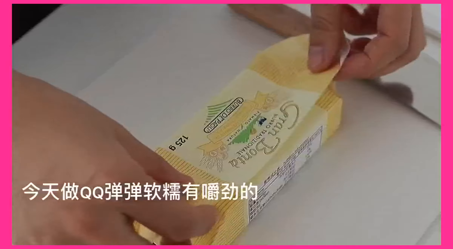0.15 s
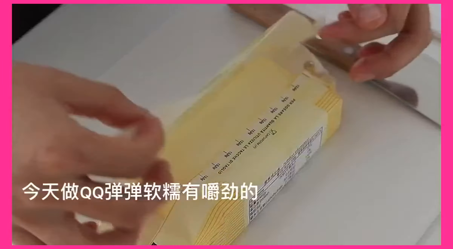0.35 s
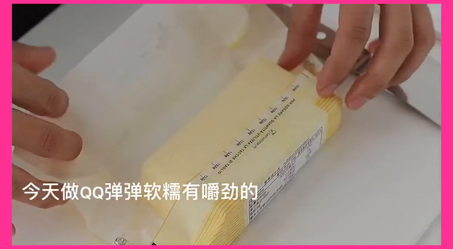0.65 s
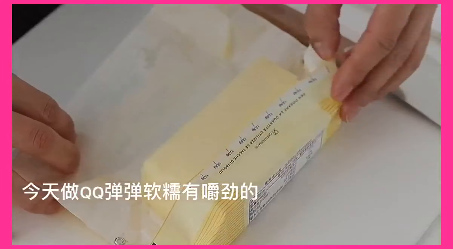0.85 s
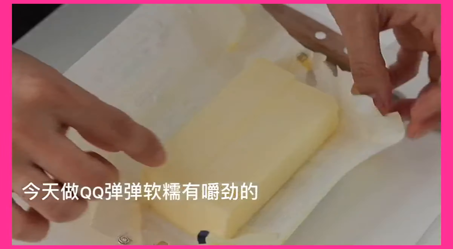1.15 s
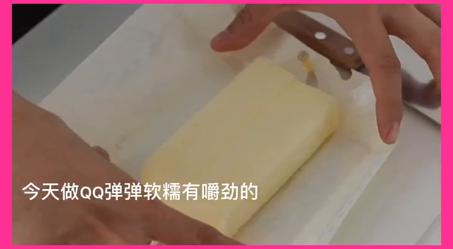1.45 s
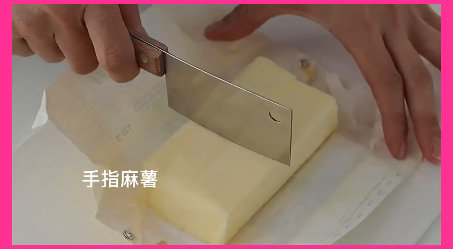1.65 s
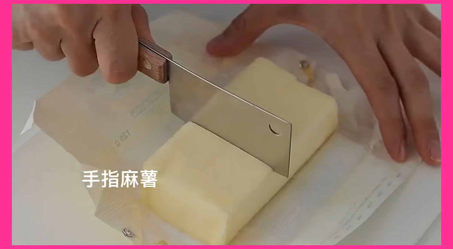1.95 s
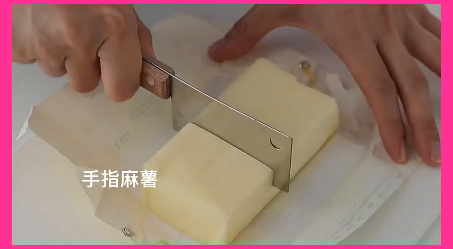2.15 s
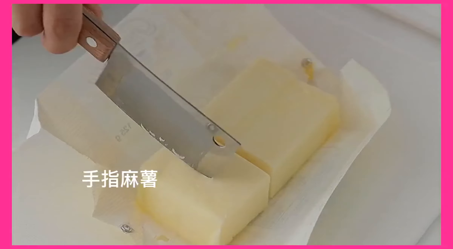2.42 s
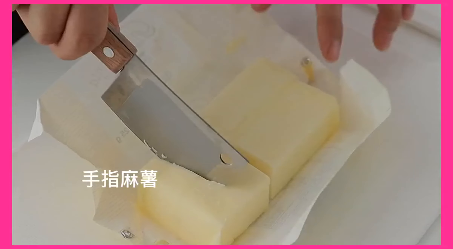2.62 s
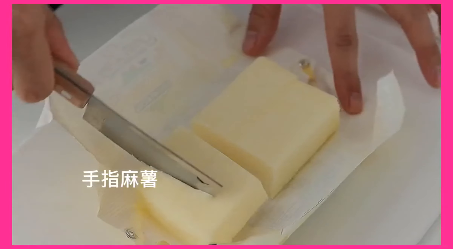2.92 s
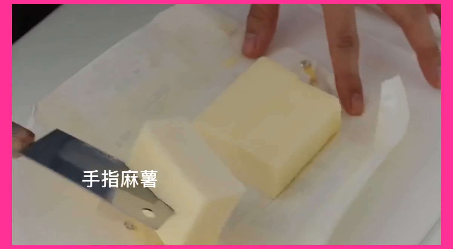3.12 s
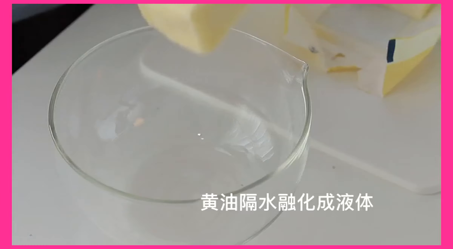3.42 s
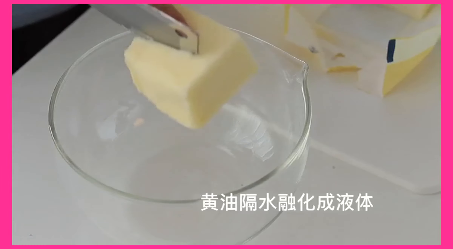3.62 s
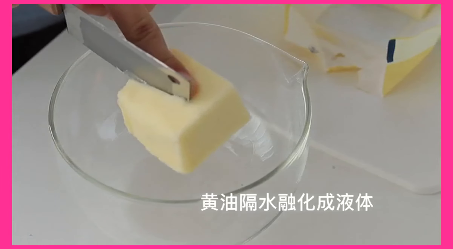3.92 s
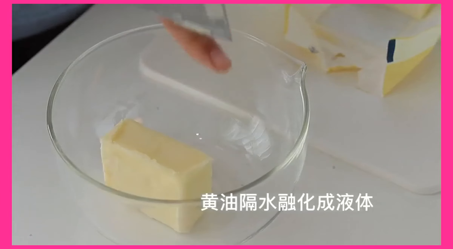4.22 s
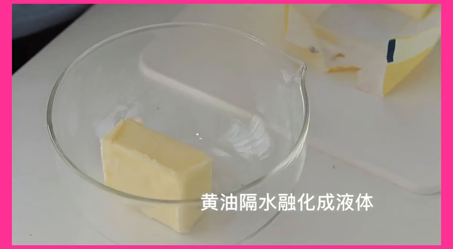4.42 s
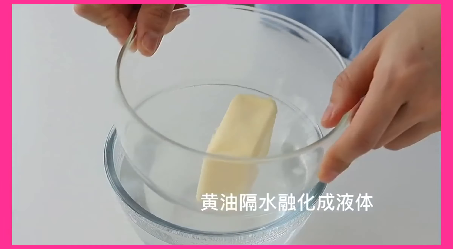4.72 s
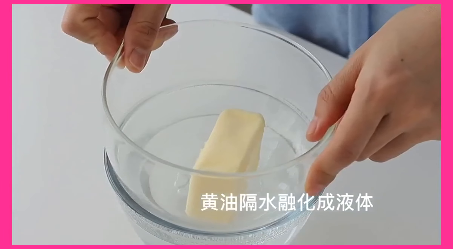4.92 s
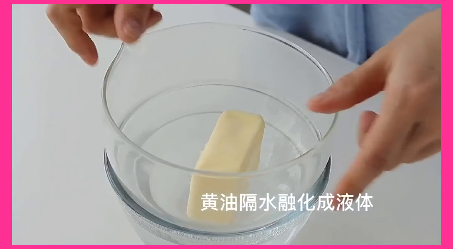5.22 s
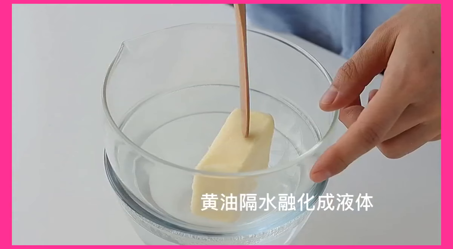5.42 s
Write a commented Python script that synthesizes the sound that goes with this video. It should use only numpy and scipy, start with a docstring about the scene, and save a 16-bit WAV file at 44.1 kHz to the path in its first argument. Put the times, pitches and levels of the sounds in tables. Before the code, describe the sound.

Close microphone, slight stereo width, dry small room. Rapid crisp paper crinkles with low table bumps come first, then isolated snaps and scrapes while butter is cut and lifted. A quiet gap ends with a soft double thud of butter in glass. Room tone jumps to a faint whir, glass knocks hard on glass five or six times, rattles, and settles with a thin squeak and low table hum.

```python
"""In a quiet kitchen, hands unfold the paper around a block of butter and cut it on a board with a cleaver.
Paper is resonance-coloured grain with creases that crack; hands and blade push low resonances of board and table.
The piece lands in a glass bowl as damped modes with wet slaps; that bowl then knocks and rattles onto
a second bowl of water, both ringing in their own modes. Four successive stretches each have their own
room tone: hush, the whir of an appliance, hum and whine, heard close up with a slight stereo width."""
import sys
import numpy as np
from scipy import signal
from scipy.fft import rfft, irfft, next_fast_len
from scipy.io import wavfile
from scipy.ndimage import uniform_filter1d

SR = 44100
rng = np.random.default_rng(int(sys.argv[2]) if len(sys.argv) > 2 else 0)


def wav_record(signal):
    """Record a signal, one row per channel, as 16-bit PCM in the file named by sys.argv[1]."""
    frames = np.transpose(np.atleast_2d(signal))
    bounded = np.clip(frames, -1, 1)
    # unit amplitude maps onto the largest positive 16-bit level
    quanta = np.round(bounded * 32767).astype(np.int16)
    wavfile.write(sys.argv[1], SR, quanta)


N = 245195
TIME = np.arange(N) / SR
COARSE_TIME = TIME[::32]  # slow gain curves are computed on this grid

# Stretches of room tone: start t/s, tone level/dB, whir share (power, 0-1), whine level/dB,
# side level against the tone/dB
STRETCHES = [(0.042, -52.5, 0.53, -90, -17), (1.651, -53.5, 0.01, -87, -21), (3.508, -60, 0, -80.5, -2),
             (4.519, -49.5, 0.94, -72.5, -31.5)]
# Glass on glass: t/s, level/dB, clack f/Hz, treble against the clack/dB, upper-bowl ring/dB, lower-bowl ring/dB,
# then level offsets of the contact modes/dB: below 1 kHz, 1-4 kHz, above 4 kHz
KNOCKS = [(4.834, -0.5, 2010, -13.5, -22.5, -49, -23, -9, -23.5),
          (4.943, -1, 2730, -46, -29.5, -18, -38, -9, -27),
          (4.971, -14.5, 895, -46, -45, -47.5, -31, -5, -30),
          (5.006, -0.5, 3020, -20, -26.5, -33.5, -35, -7.5, 0),
          (5.064, -3.5, 1750, -6.5, -38, -17.5, 5, -7, -1), (5.088, -8, 2100, -18, -55, -31, -2, -10, -17)]
# The whistle as the fingers let go: start t/s, end t/s
SQUEAK_SPAN = (5.265, 5.33)


def amp(db):
    """Converts level/dB to an amplitude ratio."""
    return 10 ** (np.asarray(db) / 20)


def evened(x):
    """Normalises to unit root-mean-square amplitude."""
    return x / np.sqrt(np.mean(x ** 2) + 1e-20)


def colour(x, points):
    """Linear filtering: multiplies the spectrum by a gain curve of (f/Hz, level/dB) points."""
    size = next_fast_len(len(x))
    f, db = np.transpose(points)
    hz = np.fft.rfftfreq(size, 1 / SR)
    gain = amp(np.interp(np.log(hz + 1), np.log(f + 1), db))
    return irfft(rfft(x, size) * gain, size)[:len(x)]


def band(x, hz, width):
    """Damped resonator: a two-pole resonance of gain near 1, its bandwidth set by the pole radius."""
    r = np.exp(-np.pi * width / SR)
    angle = 2 * np.pi * hz / SR
    return signal.lfilter([1 - r * r], [1, -2 * r * np.cos(angle), r * r], x) * np.sin(angle)


def band_twice(x, hz, width, second_ratio):
    """Cascaded resonators: two resonances at one frequency give steeper skirts."""
    return band(band(x, hz, width), hz, second_ratio * width)


def treble(x):
    """Band-pass filtering from 5 to 12 kHz."""
    return signal.sosfilt(signal.butter(2, [5000, 12000], "band", fs=SR, output="sos"), x)


def add(mix, s, sound):
    """Superposition: adds a sound into the mix from time s."""
    part = mix[round(s * SR):][:len(sound)]
    part += sound[:len(part)]


def loudness(rows):
    """Amplitude envelope along (t/s, level/dB) points, silent outside them."""
    s, db = np.transpose(rows)
    return uniform_filter1d(amp(np.interp(TIME, s, db, -200, -200)), 60)


def swells(rows):
    """Exponential envelopes, one a row: straight rise and fall in dB, confined to the stretch of the peak."""
    peak, db, rise, fall = np.transpose(rows)[:4, :, None]
    starts = np.transpose(STRETCHES)[0]
    before = (peak - COARSE_TIME) / np.maximum(rise, .001)
    after = (COARSE_TIME - peak) / np.maximum(fall, .001)
    same_stretch = np.searchsorted(starts, COARSE_TIME) == np.searchsorted(starts, peak)
    swell_db = 20  # gained over a rise time, lost over a fall time
    return amp(db - swell_db * np.maximum(before, after)) * same_stretch


def total(gains):
    """Incoherent addition: the power sum of gain curves, at full rate."""
    return np.interp(TIME, COARSE_TIME, np.sqrt((gains ** 2).sum(0)))


def ring(modes, t, scatter_db=3):
    """Modal synthesis: damped sines whose starting levels are scattered at random."""
    place_db = scatter_db * rng.standard_normal(len(modes))
    return sum(amp(db + p - 60 * t / t60) * np.sin(2 * np.pi * hz * t)
               for (hz, db, t60), p in zip(modes, place_db))


def crack(peak_db, hz, treble_db, wide_db, t60, grit):
    """Impulse excitation: one flip and a little grit drive a round pop, a wide click and a spit of treble."""
    t = np.arange(len(grit)) / SR
    burst = grit * (1 - np.exp(-t / (0.15 * t60))) ** 2 * amp(-60 * t / t60)
    burst[int(.06 * t60 * SR)] += 8 * np.sign(grit[0])  # the flip is instantaneous
    width = hz * (.16 + .2 * min(amp(wide_db), 1))  # a stronger click goes with a shorter pop
    pop = band_twice(burst, hz, width, 2)
    click = band(band(.5 * burst + grit * amp(-90 * t / t60), 2600, 2600), 3100, 1500)
    body = pop / abs(pop).max() + amp(wide_db) * click / abs(click).max()
    body = signal.sosfilt(signal.butter(3, [500, 4600], "band", fs=SR, output="sos"), body)
    spit = treble((.4 * burst + grit * amp(-40 * t / t60)) * amp(-30 * t / t60))
    return amp(peak_db) * (body / abs(body).max() + amp(treble_db) * spit / abs(spit).max())


def rustle():
    """Stochastic friction: clumped fibre clicks over sliding hiss, in the shifting resonances of a bent sheet."""
    # Tugs and slides of the paper: peak t/s, level/dB, rise t/s, fall t/s, treble against the rustle/dB,
    # tautness/dB moved from the low to the high half
    tugs = [(0.049, -28, 0.0017, 0.12, -16, -0.5), (0.118, -26.5, 0.0097, 0.2, -12, -3),
            (0.157, -12.5, 0.027, 0.016, -8, 3.5), (0.225, -22.5, 0.077, 0.041, -6.5, 3.5),
            (0.299, -31.5, 0.057, 0.19, -10.5, -3), (0.358, -20.5, 0.028, 0.02, -13, -3.5),
            (0.439, -18.5, 0.035, 0.023, -25, -5), (0.484, -20, 0.0037, 0.013, -33.5, -5),
            (0.517, -35.5, 0.014, 0.19, -40, -8), (0.667, -23.5, 0.028, 0.045, -9.5, 3),
            (0.75, -37.5, 0.12, 0.038, -20, 2.5), (0.768, -22.5, 0.0019, 0.018, -22, -9),
            (0.89, -28, 0.028, 0.02, -4.5, 11.5), (0.985, -47.5, 0.2, 0.027, -4, 11.5),
            (1.032, -20.5, 0.034, 0.045, -5.5, 6.5), (1.087, -13.5, 0.043, 0.046, -18, -1.5),
            (1.136, -31.5, 0.048, 0.027, -27.5, 2), (1.213, -24, 0.046, 0.022, -14, 0),
            (1.334, -32, 0.054, .06, -8.5, 5), (1.366, -18.5, 0.02, 0.027, -17, -4),
            (1.449, -23, 0.018, 0.054, -28, -2.5), (1.481, -27, 0.025, 0.14, -11.5, 7.5),
            (1.585, -24, 0.14, 0.038, -20.5, -1.5), (1.64, -30, 0.023, 0.027, -9, 4.5),
            (1.731, -50.5, 0.12, 0.084, -1, 4.5), (2.039, -35, 0.011, .036, -14.5, 7.5),
            (2.095, -44.5, 0.014, 0.099, -19, 0.5), (2.222, -30, 0.014, 0.054, -29, -1.5),
            (2.321, -36.5, 0.033, 0.077, -38, -10.5), (2.386, -18, 0.014, 0.036, -11, -6),
            (2.458, -29, 0.023, 0.0036, -8, -1), (2.727, -18.5, 0.014, 0.071, -11, 1.5),
            (2.771, -24, 0.026, .12, -9, -1), (2.862, -32, 0.081, 0.059, -14, 12),
            (2.902, -27, 0.0021, 0.058, -9, 1), (3.001, -25, 0.11, 0.018, -16, -2),
            (3.051, -31.5, 0.034, 0.014, -15, -6), (3.073, -40.5, 0.012, 0.049, -7, 3),
            (3.141, -40.5, 0.0025, 0.11, -5, -1), (3.27, -15, 0.022, 0.025, -15.5, -3),
            (3.324, -40.5, 0.027, 0.054, -32, 6.5), (3.428, -25.5, 0.012, 0.018, -13, -3.5),
            (3.46, -44, 0.016, 0.16, -10, 4), (4.194, -30.5, 0.022, 0.04, -5.5, 1)]
    # Spectrum of the rustle: f/Hz, relative level/dB per Hz
    paper_spectrum = [(250, -24), (480, -13.5), (770, -3), (1200, -4), (2100, -5.5), (3700, -9.5),
                      (4700, -28.5), (6000, -57.5)]
    # Spectrum of its treble: f/Hz, relative level/dB per Hz
    fibre_spectrum = [(3000, -16.5), (4500, -1), (5500, 2.5), (8000, 2), (12000, -4.5), (15300, -4),
                      (15700, -52.5)]
    # Hiss of the cleaver dragging off the paper: t/s, level/dB
    blade_level = [(3.27, -45.5), (3.3, -49), (3.41, -52.5)]

    clumps = evened(uniform_filter1d(uniform_filter1d(rng.standard_normal(N), 120), 120))
    struck = rng.random(N) < 3000 / SR  # about 3000 clicks a second
    clicks = struck * amp(4 * np.minimum(rng.exponential(1, N), 5)) * rng.choice([-1, 1], N)
    grain = (evened(clicks) * .65 + rng.standard_normal(N)) * amp(1.5 * clumps)

    hz, t, z = signal.stft(grain, SR, nperseg=256)
    patches = evened(uniform_filter1d(uniform_filter1d(rng.standard_normal(z.shape), 3, 0), 9, 1))
    gains = swells(tugs)
    treble_db, taut_db = np.transpose(tugs)[4:, :, None]
    power = gains ** 2
    taut = np.interp(t, COARSE_TIME, (power * taut_db).sum(0) / (power.sum(0) + 1e-20))
    tilt = np.clip(np.log2(hz / 1700 + 1e-9), -1, 1) * (hz < 4500)  # pivots about 1700 Hz
    lean = tilt[:, None] * taut
    grain = signal.istft(z * amp(3.7 * patches + lean), SR, nperseg=256)[1][:N]

    blade = loudness(blade_level) * evened(band(rng.standard_normal(N), 3750, 300))
    sheet = total(gains) * evened(colour(grain, paper_spectrum))
    fibres = total(gains * amp(treble_db)) * evened(colour(grain, fibre_spectrum))
    return sheet + fibres + blade


def snaps():
    """Snap-through buckling: each crease cracks, and the sheet shivers on for a moment."""
    # Creases snapping over: t/s, peak level/dB, pop f/Hz, treble against the body/dB, wide click against the pop/dB
    creases = [(0.075, -16, 1200, -13, -34), (0.111, -11.5, 1500, -20.5, 7), (0.149, -7, 1130, -20, -21),
               (0.157, -5, 1500, -22, -11), (0.188, -9.5, 1630, -30, -40), (0.207, -2.5, 2232, -11, 7),
               (0.239, -1.5, 1520, -25, -2), (0.254, -4.5, 2240, -11.5, -27), (0.276, -12, 1600, -12, -16),
               (0.289, -17, 1530, -28, 7), (0.313, -14, 890, -25, 1), (0.328, -4, 950, -15, -6.5),
               (0.355, -0.5, 787, -12.5, 1), (0.4, -17.5, 1240, -29, -14), (0.422, -9, 1580, -17, 2),
               (0.431, -4, 1600, -24, -12), (0.438, -4, 1470, -13.5, -4), (0.447, -20, 1100, -34.5, -9),
               (0.473, -7.5, 1350, -25, -13), (0.481, -4.5, 1110, -28.5, -4.5), (0.515, 0, 1620, -24, -6.5),
               (0.544, -25.5, 592, -44, -20), (0.59, -30.5, 900, -5.5, -3), (0.666, -1.5, 1950, -21, -7.5),
               (0.766, 0, 2900, -54, 6), (0.767, -6, 1314, -43, -33), (0.783, -7.5, 1440, -30, -3.5),
               (0.867, -9.5, 2900, -4.5, -5), (0.899, -11.5, 2600, -15, -39), (0.997, -8.5, 1830, -31, -32),
               (1.06, -3.5, 1230, -23.5, 6), (1.084, -3, 1170, -9, -0.5), (1.093, -3.5, 2680, -27, -21),
               (1.125, -9.5, 1960, -25, 2), (1.186, -7.5, 1810, -13.5, -4.5), (1.483, -7, 1700, -12, 8.5),
               (1.515, -9, 2200, -24, 9), (1.565, -16, 617, -35, -11), (1.583, 3.5, 3760, -12, -3),
               (1.587, -9, 3000, -20, 4), (1.603, -13, 1950, -27, -1.5), (1.629, -16, 1770, -16.5, -12),
               (1.642, -13.5, 2120, -16.5, -5.5), (2.036, -24, 1480, -25, -36), (2.089, -23, 1750, -22, -4),
               (2.217, -12, 907, -37, -26), (2.218, -6.5, 1790, -31.5, -3.5),
               (2.294, -20.5, 1780, -23.5, -9.5), (2.318, -20, 826, -47, -27),
               (2.318, -18.5, 1760, -43, -30), (2.377, -5, 3660, -33, -15), (2.381, -5, 2900, -33, -9),
               (2.39, -8, 2700, -33, 17), (2.421, -11.5, 1330, -16, 2), (2.451, -9.5, 1790, 2, 5.5),
               (2.727, -6.5, 1850, -16, 0), (2.734, 2.5, 3520, -15.5, -5.5), (2.904, 0.5, 2100, -33, 11),
               (2.913, -5, 2960, -27, 3), (2.935, -24, 4150, 12.5, -10), (2.957, -4, 2290, -9.5, 12),
               (2.979, -6, 3400, -16.5, -4), (2.996, -14, 1260, -10, -4), (3.015, -11.5, 3220, -11, -10),
               (3.048, 0.5, 3700, -10, -6), (3.14, -21.5, 980, -2.5, -4), (3.23, -20.5, 730, -9.5, -12),
               (3.252, -4, 1780, -24.5, -10), (3.268, 3, 2900, -6.5, 13), (3.275, -1, 3560, -23, -17),
               (3.424, -3.5, 4000, -7, -21), (3.43, 0, 3220, -6.5, -9.5), (3.49, -29, 2910, -7.5, 2.5)]
    out = np.zeros(N)
    for (s, db, *tone), grit in zip(creases, rng.standard_normal((len(creases), 2500))):
        t60 = .012 - .0004 * db  # seconds; softer snaps ring a little longer
        add(out, s, crack(db, *tone, t60, grit))
    t = np.arange(3000) / SR
    shiver = rng.standard_normal(3000) * amp(-60 * t / .06) * (t > .003)
    return out + amp(-17) * signal.oaconvolve(out, shiver / np.linalg.norm(shiver))[:N]


def push():
    """Forced resonance: pressing hands and blade drive low noise through the modes of table and board."""
    # Pushes: peak t/s, level/dB, rise t/s, fall t/s, board against the table/dB
    pushes = [(0.366, -38, 0.031, 0.033, 13), (0.44, -23.5, 0.038, 0.063, -12.5),
              (1.14, -35.5, 0.13, 0.061, -1.5), (1.369, -23.5, 0.033, 0.056, -8),
              (1.521, -27, 0.025, 0.061, -23), (1.78, -43.5, 0.13, 0.1, -23),
              (2.062, -33, 0.049, 0.14, -27), (2.309, -33, 0.068, 0.055, -19),
              (2.396, -38.5, 0.021, 0.06, 8.5), (2.435, -17.5, 0.078, 0.035, -13.5),
              (2.752, -23, 0.042, 0.12, -15), (2.95, -41.5, 0.055, 0.082, -17),
              (3.266, -21.5, 0.028, 0.033, 2.5), (4.829, -41.5, 0.015, 0.15, 2.5),
              (5.04, -39, 0.13, 0.062, -3), (5.099, -25.5, 0.066, 0.081, -31),
              (5.29, -37.5, 0.023, 0.034, -35), (5.522, -39, 0.02, 0.4, -12.5)]
    # Table resonances: f/Hz, bandwidth/Hz, relative level/dB
    table_modes = [(33, 13, 1), (94, 18, 4), (143.1, 6.6, 1.5), (216.4, 16, -13)]
    # Board resonances: f/Hz, bandwidth/Hz, relative level/dB
    board_modes = [(268, 100, 0.5), (362.5, 350, 13), (546, 32, 0)]

    noise, gains = rng.standard_normal(N), swells(pushes)
    low, board = (evened(sum(amp(db) * evened(band_twice(noise, hz, w, 3)) for hz, w, db in modes))
                  for modes in (table_modes, board_modes))
    # slow level swings of the low noise are flattened
    steady = low / np.sqrt(uniform_filter1d(low ** 2, 2500) + .05)
    # a faint low rumble of the table lies under the first two stretches
    rumble = amp(-66.5) * (TIME > STRETCHES[0][0]) * (TIME < STRETCHES[2][0])
    board_db = np.transpose(pushes)[4, :, None]
    return (total(gains) + rumble) * steady + total(gains * amp(board_db)) * board


def drop():
    """Soft impact: a finite contact time smooths the blow to the bowl; a wet slap and a dull room tail join it."""
    # Butter landing and tipping: t/s, blow peak/dB, slap peak/dB, contact time/ms, click against the slap's pop/dB
    landings = [(4.192, -3, -11, 3.04, -2.5), (4.21, 0, -8, 0.88, -12), (4.228, -27, -27, 1.34, -23)]
    # Bowl on table: f/Hz, relative level/dB, t60/s
    thud_modes = [(77.2, -2, 0.31), (91.6, 10, 0.21), (147.8, 2.5, 0.23), (324, -17.5, 0.27),
                  (396, 0.5, 0.12), (454, -8.5, 0.21), (505, -5, 0.1), (654, -23.5, 0.44), (880, -21, 0.15),
                  (990, -17.5, 0.18), (1100, -30, 0.42)]

    out, t = np.zeros(N), np.arange(SR // 2) / SR
    grits = rng.standard_normal((len(landings), 2500))
    for (s, blow_db, slap_db, ms, click_db), grit in zip(landings, grits):
        contact = np.hanning(int(ms * SR / 1000) + 3)
        body = np.convolve(ring(thud_modes, t, scatter_db=1), contact / contact.sum())
        # the thud carries little below about 62 Hz
        body = signal.lfilter(*signal.butter(2, 62, "high", fs=SR), body)
        add(out, s, amp(blow_db) * body / abs(body).max())
        add(out, s + ms / 2000, crack(slap_db, 1150, click_db - 12, click_db, 0.006, grit))
    tail = colour(rng.standard_normal(len(t)), [(200, 8.0), (400, 4.0), (1100, -4.0), (2500, -43.5)])
    add(out, landings[1][0], amp(-26 - 60 * t / 0.3) * evened(tail))
    return out


def knocks():
    """Coupled impact: each knock clacks, excites the touching rims and rings the modes of both bowls."""
    # Both rims while they touch: nominal f/Hz, relative level/dB, nominal t60/s
    contact_modes = [(650, -9, .04), (1600, -8, .035), (1950, -6, .03), (2780, 0, .05), (3150, -1, .045),
                     (3600, -8, .025), (4750, -17, .03), (5080, -14, .03)]
    # Upper bowl: f/Hz, relative level/dB, t60/s
    upper_modes = [(388, -10, .4), (455, -6, .2), (1436, -5, .35), (1477, -6, .35), (1850, -10, .08),
                   (2715, -3, .14), (3250, -6, .04), (4743, -13, .3), (7381, -18, .25), (8489, -20, .08),
                   (9647, -13, .12), (12200, -20, .12), (15180, -24, .12)]
    # Lower bowl: f/Hz, relative level/dB, t60/s
    lower_modes = [(145, -12, .3), (510, -5, .15), (880, -12, .12), (2515, -2, .3), (2980, 2, .09),
                   (5000, -8, .08), (7250, -14, .07), (10450, -16, .07), (12700, -22, .07)]

    out, t = np.zeros(N), np.arange(SR // 2) / SR
    grits = rng.standard_normal((len(KNOCKS), 2500))
    for (s, db, hz, treble_db, upper_db, lower_db, *part_db), grit in zip(KNOCKS, grits):
        add(out, s, crack(db, hz, treble_db, -4 + db, 0.018, grit))
        touched = [(f, d + part_db[np.searchsorted([1000, 4000], f)], t60) for f, d, t60 in contact_modes]
        detuned_t = t * rng.uniform(.985, 1.015)  # each knock's modes are detuned at random by up to 1.5 %
        add(out, s, amp(db) * ring(touched, detuned_t, scatter_db=2.5) * np.minimum(t / .0006, 1))
        seated = np.clip((s - 4.93) / .13, 0, .9)  # the deeper it sits, the more the ring blurs
        wobble = evened(uniform_filter1d(rng.standard_normal(len(t)), 150))  # touching rims damp unevenly
        upper = amp(db + upper_db) * ring(upper_modes, t) * (1 + 0.45 * wobble[::-1])
        lower = amp(db + lower_db) * ring(lower_modes, t) * (1 - seated + seated * wobble)
        add(out, s, upper + lower)
    return out


def rim_chatter():
    """Sustained excitation: between knocks the chattering rims feed noise to broad and narrow resonances."""
    # Drive as the bowl settles: t/s, level/dB
    rattle_level = [(4.83, 5), (4.85, -10), (5.0, -2), (5.1, 1), (5.2, -20), (5.33, -30), (5.4, -70)]
    # Where the chatter gathers: f/Hz, bandwidth/Hz, gain/dB
    rim_modes = [(2900, 87, -21), (4820, 150, -32), (142.6, 8, -7.5), (263, 10, -12.5), (379, 6.9, -21.5),
                 (495, 5.5, -16)]
    chatter = loudness(rattle_level) * rng.standard_normal(N)
    out = colour(chatter, [(100, -54.0), (500, -21.0), (3000, -26.5), (5500, -55.0), (9000, -64.0)])
    return out + sum(amp(db) * band(chatter, hz, width) for hz, width, db in rim_modes)


def settling():
    """Free decay and friction: the table hums once, seated rims shimmer, and releasing fingers whistle thinly."""
    # Table hum as the bowl comes to rest: t/s, f/Hz, level/dB, t60/s
    table_hum = (5.5, 142, -22.5, 0.62)
    # Shimmer of the rims: f/Hz, bandwidth/Hz, starting level/dB, t60/s
    shimmer_modes = [(2930, 300, -40.5, .75), (4950, 300, -49, .42)]
    # Whistle partials: f/Hz, level/dB at the end of the swell
    whistle_partials = [(4400, -53.5), (6150, -70), (8200, -63.5)]

    out, t = np.zeros(N), np.arange(SR // 2) / SR
    add(out, table_hum[0], ring([table_hum[1:]], t, scatter_db=1) * np.minimum(t / .02, 1))

    last_knock = KNOCKS[-1][0]
    t = np.arange(0, SQUEAK_SPAN[1] - last_knock, 1 / SR)  # lasts until the fingers let go
    shimmer = sum(amp(db - 60 * t / t60) * evened(band_twice(rng.standard_normal(len(t)), hz, w, 2))
                  for hz, w, db, t60 in shimmer_modes)
    add(out, last_knock, shimmer)

    t = np.arange(*SQUEAK_SPAN, 1 / SR)
    whistle = sum(amp(db) * np.sin(2 * np.pi * hz * t) for hz, db in whistle_partials)
    swell = np.linspace(.2, 1, len(t))
    add(out, t[0], whistle * signal.windows.tukey(len(t), .3) * swell)
    return out


def wash():
    """Band-limited noise: an upper hiss fades as the bowl comes down."""
    # Hiss: t/s, level/dB
    hiss_level = [(4.52, -53.5), (4.8, -53.5), (5.1, -69)]
    return loudness(hiss_level) * evened(band(band(rng.standard_normal(N), 3660, 2460), 2050, 2900))


def room_tone():
    """Stationary noise: hush and whir share the power of each stretch, with wavering hum and thin electric whine."""
    # Hush: f/Hz, relative level/dB per Hz
    hush_spectrum = [(25, 12), (64, -3.5), (101, 8.5), (126, -25.5), (200, -11), (480, -5), (1300, -11.5),
                     (3500, -14.5), (5500, -20.5), (15400, -24), (15800, -42.5)]
    # An appliance running nearby: f/Hz, relative level/dB per Hz
    whir_spectrum = [(25, -25), (101, 0.5), (135, -31.5), (200, -11.5), (470, -21.5), (800, 5), (1230, 4.5),
                     (1420, 11), (1750, -3), (3800, -26.5), (5500, -21.5), (15400, -23), (15800, -52.5)]
    # Hum: f/Hz, level/dB
    hum_partials = [(91.5, -68), (199.2, -71)]
    # Whine, one a stretch: f/Hz
    whine_hz = [8000, 8000, 8000, 9997]

    start, db, share, whine_db, wide_db = np.transpose(STRETCHES)
    stretch = np.searchsorted(start, TIME) - 1
    hush, whir = (evened(colour(rng.standard_normal(N), points)) for points in (hush_spectrum, whir_spectrum))
    share = np.clip(share, 0, 1)[stretch]
    tone = amp(db[stretch]) * (np.sqrt(1 - share) * hush + np.sqrt(share) * whir)
    tone += sum(amp(d) * evened(band(rng.standard_normal(N), f, 2.6)) for f, d in hum_partials)
    whines = [evened(band(rng.standard_normal(N), f, 6)) for f in whine_hz]
    tone += amp(whine_db[stretch]) * np.choose(stretch % len(STRETCHES), whines)
    # the room reaches each side differently
    other = colour(evened(colour(rng.standard_normal(N), hush_spectrum)), [(150, -16), (800, 0)])
    side = amp(db[stretch] + wide_db[stretch]) * other
    return (tone + np.array([side, -side])) * (stretch >= 0)


def spread(mid):
    """Partial decorrelation: left and right differ by a faint random-phase haze, mostly in the treble."""
    # Side against mid: f/Hz, level/dB
    side_spectrum = [(60, -42), (1300, -40.5), (2800, -44), (5500, -17.5), (15000, -7.5)]
    z = signal.stft(mid, SR, nperseg=256)[2]
    haze = signal.istft(z * np.exp(2j * np.pi * rng.random(z.shape)), SR, nperseg=256)[1][:N]
    side = colour(haze, side_spectrum)
    return np.array([mid + side, mid - side])


def scene():
    """Superposition: all sources add up close and central, over the room tone."""
    paper = rustle() + snaps()
    glass = knocks() + rim_chatter() + settling()
    return spread(paper + push() + drop() + glass + wash()) + room_tone()


def record(dry):
    """Amplitude clipping: peaks beyond the limit overload; a linear-phase low-pass then sets the band limit."""
    clipped = np.clip(dry, -.98, .98)
    low_pass = signal.firwin(1023, 16400, window=("kaiser", 12), fs=SR)  # edge in Hz
    return signal.oaconvolve(clipped, low_pass[None], "same")


dry = scene()
out = record(dry)
wav_record(out)
```